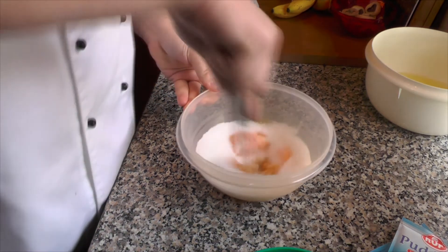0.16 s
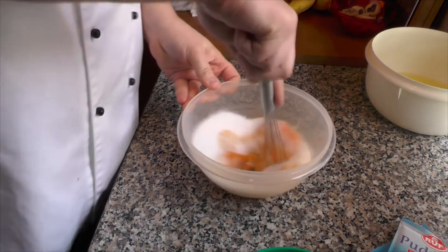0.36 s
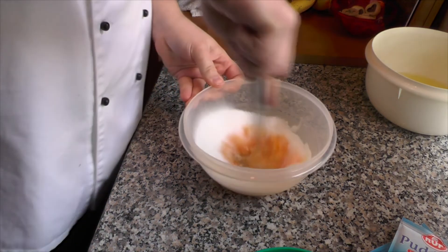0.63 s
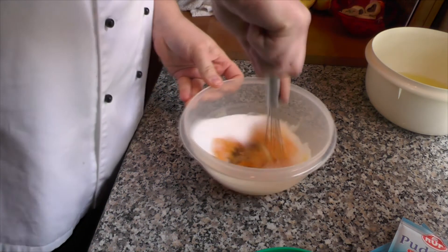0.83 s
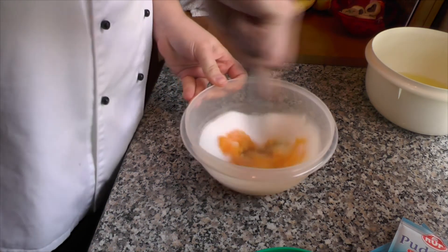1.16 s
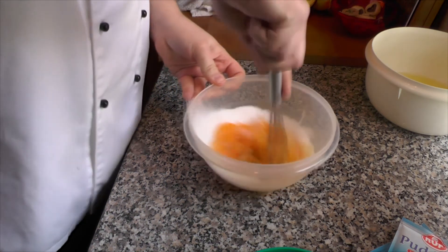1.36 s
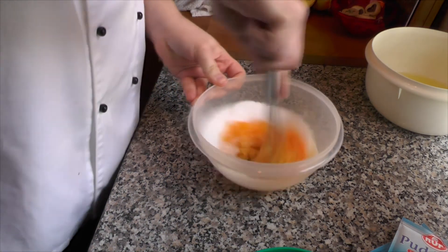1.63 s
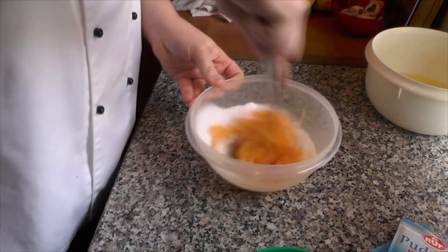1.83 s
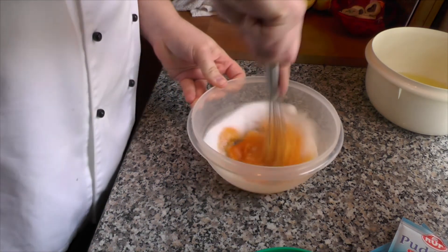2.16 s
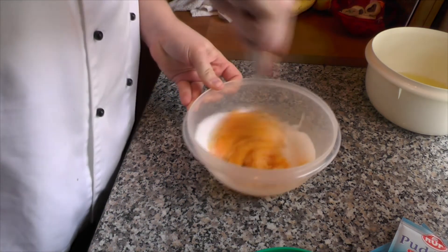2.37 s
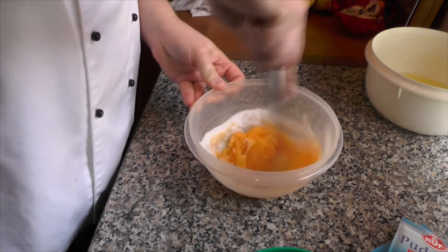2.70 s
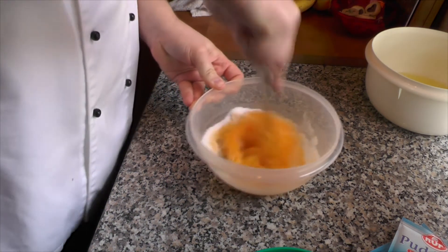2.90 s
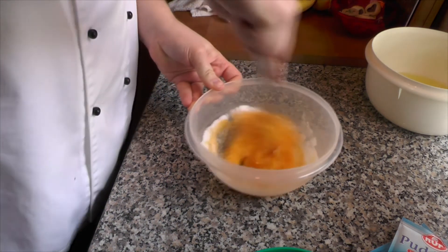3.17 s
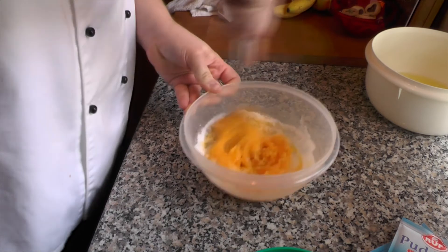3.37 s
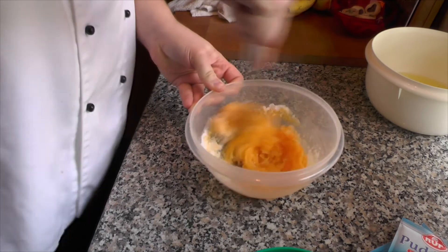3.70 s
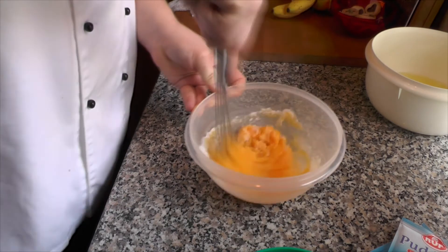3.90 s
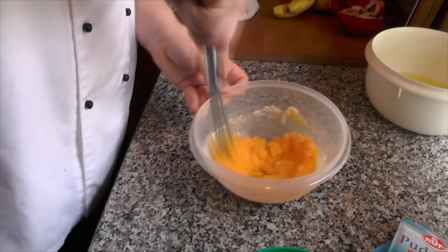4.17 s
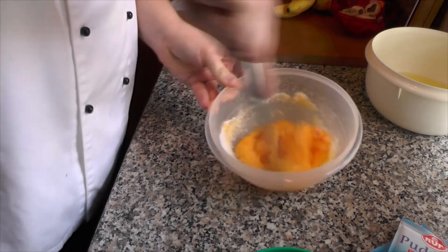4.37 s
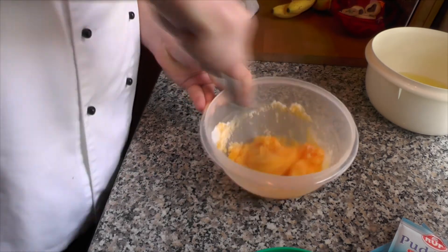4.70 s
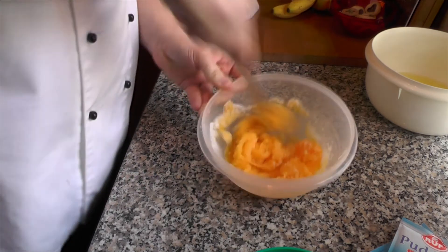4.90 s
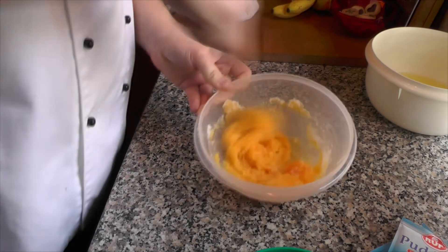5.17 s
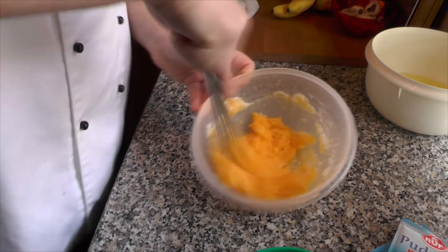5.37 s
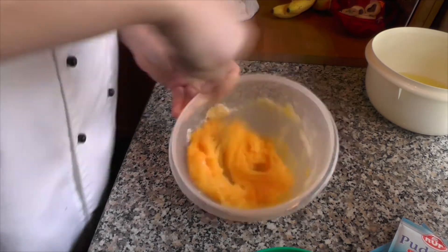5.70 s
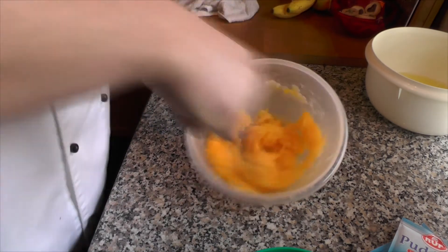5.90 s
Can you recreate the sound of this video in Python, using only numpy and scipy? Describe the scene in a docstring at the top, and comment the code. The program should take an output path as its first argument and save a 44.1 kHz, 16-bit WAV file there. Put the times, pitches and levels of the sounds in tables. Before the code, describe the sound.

A metal whisk beats yolks and sugar in a thin plastic bowl on a stone counter. Quick, uneven strokes, several per second, crunch and hiss over gritty sugar, with hollow plastic knocks and dry wire clicks. Early strokes drum more on the bowl; later ones are brighter and more crackly. Close stereo microphone in a small, fairly dry kitchen, stronger on the right, with faint low room air.

```python
"""Whisk in a thin plastic bowl

A wire whisk beats egg yolks and sugar in a thin plastic bowl on a stone kitchen counter.
Dragged sugar crunches and hisses as random grains, which also excite the resonant modes of the bowl.
Knocks strike those modes at once; cracks are dying noise bursts, wire flicks and bowl bumps short damped sines.
One of two microphone ports is half shaded: it is filtered, shifted in phase and partly decorrelated."""
import sys
import numpy as np
from scipy import signal
from scipy.fft import rfft, irfft, next_fast_len
from scipy.io import wavfile

SR = 44100
rng = np.random.default_rng(int(sys.argv[2]) if len(sys.argv) > 2 else 0)


def unload_wav(signal):
    """Save mono or channel-first audio to the path in sys.argv[1] as 16-bit WAV at rate SR, clipped to [-1, 1]."""
    wavfile.write(
        sys.argv[1],
        SR,
        np.round(np.clip(np.atleast_2d(signal).T, -1, 1) * 32767).astype(np.int16),
    )


def ratio_of_db(decibels):
    """Turn decibels (scalar or array-like) into linear amplitude factors; 0 dB maps to 1."""
    return 10 ** (np.asarray(decibels, float) / 20)


N = 266364   # length in samples
SIZE = next_fast_len(N + SR)   # transform length in samples
HZ = np.maximum(np.arange(SIZE // 2 + 1) * SR / SIZE, 1)

# Source levels are relative: later gains and filters apply to them.
# room air, spectral density: pitch_hz, level_db (per Hz)
AIR_SPECTRUM = [(13, -40), (22, 0), (45, -4), (71, -4.5), (146, 2.5), (200, 1.5), (260, -5.5), (400, -27)]
# resonant modes of the bowl: pitch_hz, level_db, t60_s
BOWL_MODES = [(306, -33, 0.013), (385, -58, 0.18), (482.5, -8.5, 0.29), (567, -16, 0.18), (597, -1.5, 0.21),
              (676, -6.5, 0.24), (718, 7, 0.17), (780, 6, 0.17), (831, 5, 0.2), (897, 4.5, 0.11),
              (975, 11.5, 0.033), (1134, 3.5, 0.066), (1100, -3, 0.08), (1210, 2, 0.051),
              (1261, 12.5, 0.039), (1339, 2, 0.11), (1363, 11, 0.025), (1503, 12, 0.037), (1567, -14, 0.14),
              (1540, -48, 0.098), (1790, -16, 0.12), (1928, -12, 0.18), (2275, -23, 0.2),
              (2670, -21, 0.061)]
# wires dragging through the paste on the bottom:
# full_force_s, hold_s, low_modes_db, high_against_low_modes_db
BOTTOM_DRAGS = [(0.0, .04, -39.5, 5.5), (0.051, 0.031, -28.5, 4.5), (0.1, 0.22, -28, -9),
                (.293, 0.085, -26.5, 3.5), (0.413, 0.097, -34, 9.5), (0.53, .1, -33, 13.5),
                (0.65, 0.066, -27, 0), (0.779, 0.13, -26, 8.5), (0.939, 0.056, -30.5, 1.5),
                (1.084, .04, -25, -10), (1.13, 0.079, -30, 8.5), (1.298, 0.047, -20, -7),
                (1.391, 0.095, -31.5, 0.5), (1.57, 0.059, -19, -3.5), (1.699, 0.068, -30, 1.5),
                (1.84, 0.078, -24.5, -1.5), (1.944, 0.015, -38, 13.5), (2.014, 0.025, -44.5, 14),
                (2.147, 0.021, -32, 3), (2.222, 0.16, -41.5, 12), (2.434, 0.028, -19, -7),
                (2.56, 0.14, -41.5, 7), (2.709, 0.025, -30, 5), (2.899, 0.09, -24.5, -3),
                (3.016, 0.29, -34, 5.5), (3.283, 0.093, -34, 6), (3.413, 0.046, -26.5, -16),
                (3.504, 0.035, -23, -13), (3.62, 0.18, -34, 2.5), (3.817, 0.15, -28.5, -2),
                (4.12, 0.083, -28.5, 1.5), (4.336, .04, -41.5, 1), (4.383, 0.077, -31.5, -12),
                (4.706, 0.047, -38.5, 7), (4.82, 0.02, -35.5, -2), (5.047, 0.031, -41.5, 16.5),
                (5.15, .09, -38, -10), (5.36, 0.016, -37, 6), (5.395, 0.043, -40, -6),
                (5.473, 0.025, -23, -11), (5.65, 0.042, -48.5, 18.5), (5.734, 0.061, -29, -13),
                (5.828, 0.054, -40, 8), (5.967, 0.084, -46, -8.5)]
# wires scraping sugar up the wall: full_force_s, rise_s, hold_s, crunch_db, hiss_against_crunch_db
WALL_SCRAPES = [(0.0, .02, 0.027, -39, -10), (0.067, 0.033, .02, -38, -7), (.16, 0.029, .01, -35, 0.5),
                (0.224, 0.024, 0.015, -30.5, -2.5), (0.307, .01, 0.058, -33, -6),
                (0.411, .005, .012, -26.5, -4), (0.443, .01, 0.059, -38, -1),
                (0.528, .008, 0.087, -32.5, -3.5), (0.658, 0.016, 0.011, -33, 0),
                (0.728, 0.026, 0.014, -36, -2), (0.781, 0.009, 0.076, -32.5, -4),
                (0.896, 0.023, 0.1, -29, -2.5), (1.088, .015, 0.027, -31.5, -6),
                (1.157, 0.026, 0.036, -29.5, -4.5), (1.235, .03, .02, -36.5, -1.5),
                (1.297, 0.016, 0.0087, -26, -8), (1.387, 0.04, 0.049, -26, -8),
                (1.494, .04, 0.028, -30, -6.5), (1.572, .006, 0.017, -21, -11.5),
                (1.674, .005, 0.049, -27, -4.5), (1.837, 0.017, .03, -32, -17),
                (1.916, 0.036, .03, -36, -1), (1.947, .006, 0.018, -28.5, -4.5),
                (2.006, .03, 0.035, -25, -10), (2.218, 0.052, 0.024, -27, -9),
                (2.287, 0.061, 0.018, -23.5, -8), (2.485, 0.019, 0.013, -21, -9),
                (2.533, .03, 0.015, -30, -2.5), (2.558, .01, 0.11, -25.5, -6),
                (2.713, 0.0076, 0.011, -25.5, -5.5), (2.78, 0.035, 0.17, -33.5, -6),
                (3.016, 0.048, 0.12, -26.5, -3.5), (3.27, 0.053, .02, -27, -6),
                (3.29, .008, 0.073, -23.5, -3), (3.385, 0.034, 0.15, -23, -2.5),
                (3.613, 0.042, 0.1, -27, -1), (3.892, 0.066, 0.061, -20.5, -3.5),
                (4.14, 0.07, 0.093, -25, -1), (4.332, 0.0067, 0.013, -24, -9),
                (4.392, 0.026, 0.02, -26, -2.5), (4.491, 0.041, 0.04, -31.5, 6),
                (4.705, 0.02, 0.022, -34, -2), (4.75, .04, 0.023, -28.5, -1.5),
                (4.814, 0.038, 0.038, -26, 2.5), (5.049, 0.022, 0.12, -26.5, -1.5),
                (5.209, 0.016, 0.021, -23.5, -4), (5.349, 0.0098, 0.023, -27.5, -4),
                (5.428, 0.026, .05, -29, -7), (5.48, .02, .01, -25, -5.5), (5.488, .005, 0.011, -25, -14),
                (5.663, 0.068, 0.045, -31, -5), (5.728, 0.033, 0.032, -27.5, -2),
                (5.807, 0.018, 0.025, -28, -4), (5.963, 0.086, 0.027, -31.5, -6),
                (6.027, 0.02, .03, -19, -5)]
# coarse crunch of the sugar, spectral density: pitch_hz, level_db (per Hz)
CRUNCH_SPECTRUM = [(1000, -7), (1700, 0), (2170, 1), (2500, 1.5), (3520, 1.5), (4490, 0), (5520, -9),
                   (7000, -7), (9100, -36), (15400, -120)]
# fine hiss of the sugar, spectral density: pitch_hz, level_db (per Hz)
HISS_SPECTRUM = [(3240, -10), (5500, 2.5), (10100, -3.5), (11300, -4.5), (12600, -3.5), (15100, -6.5),
                 (15900, -6), (16200, -49)]
# crystals cracking under a wire: start_s, peak_db, pitch_hz, treble_against_pitch_band_db
CRYSTAL_CRACKS = [(0.0548, -26, 1870, -14), (0.1027, -22, 2480, -21), (0.163, -16, 2390, -17),
                  (0.2364, -18, 2670, -13), (0.2917, -22, 1740, -14), (0.4188, -8.5, 1990, -6),
                  (0.4737, -18, 1820, -12), (0.4993, -15, 3660, -7), (0.53, -16, 3630, -14),
                  (0.5636, -16, 3890, -16), (0.6005, -19, 3390, -12), (0.6514, -13, 3380, -15),
                  (0.7783, -24, 2030, -8), (0.8754, -15.5, 3390, -17), (0.9046, -15, 1990, -11),
                  (1.0829, -21, 3040, -17), (1.1348, -11.5, 3670, -21), (1.1583, -12.5, 3130, -18),
                  (1.257, -13.5, 3580, -20), (1.294, -17.5, 3720, -9), (1.3112, -16, 1980, -13),
                  (1.38, -17.5, 1970, -20), (1.4012, -14, 3960, -17), (1.4955, -19.5, 3100, -18),
                  (1.572, -15.5, 1740, 1.5), (1.6327, -18, 1920, -22), (1.6805, -12, 2560, -20),
                  (1.7459, -25, 2030, -16), (1.7757, -16.5, 3250, -9), (1.8427, -15.5, 1850, -14),
                  (1.954, -14, 2780, -11), (2.0088, -14.5, 3130, -18), (2.16, -36, 1750, -20),
                  (2.2807, -10.5, 2500, -21), (2.4871, -12.5, 2500, -22), (2.5631, -12.5, 3000, -17),
                  (2.7132, -16.5, 1920, -18), (2.9178, -17, 2550, -21), (3.0185, -14.5, 2530, -8),
                  (3.058, -26, 3800, -12), (3.2868, -9, 2540, -12), (3.373, -21, 4500, -7),
                  (3.3897, -11.5, 2720, 3), (3.4165, -8, 3840, -9), (3.4512, -8, 2350, 1.5),
                  (3.5024, -6, 3250, -17), (3.6122, -12, 3390, -13), (3.6555, -9.5, 4200, -5),
                  (3.885, -25, 2380, -13), (3.9452, -23, 2900, -12), (4.1124, -20, 1930, -9),
                  (4.1614, -23, 3320, -12), (4.2462, -27, 4320, -11), (4.3295, -6, 1950, -6),
                  (4.3824, -12, 3720, -14), (4.4752, -15, 4300, -8), (4.546, -16, 3140, -7),
                  (4.7485, -20, 3400, -14), (4.8065, -17, 4420, 5), (4.8209, -10, 4100, -5),
                  (4.8454, -15, 2980, -13), (5.0478, -12, 2250, -13), (5.1186, -14.5, 2510, -11),
                  (5.1532, -20, 2970, 4), (5.1826, -12, 3950, -16), (5.2081, -13, 2000, -7),
                  (5.3602, -10.5, 3160, -5), (5.4254, -19, 3800, -20), (5.4934, -11.5, 2200, 2),
                  (5.6575, -15.5, 2740, -12), (5.7004, -17, 4350, -15), (5.7379, -14, 2180, -10),
                  (5.7708, -9.5, 2300, -0.5), (5.798, -13, 4680, -11), (5.9524, -20, 2900, -13),
                  (5.9713, -15, 2600, -16), (6.0122, -22, 2230, -11)]
# wires knocking on the wall: start_s, peak_db, tilt_db_per_octave (high modes against low)
WALL_KNOCKS = [(0.055, -18, -5), (0.235, -16, 7), (0.292, -13.5, 12), (0.423, -23, 9), (0.474, -18, -8),
               (0.53, -12, 3), (0.583, -10.5, 18), (0.779, -20, 14), (0.803, -14, 3), (1.09, -10.5, -1),
               (1.156, -11, 13), (1.31, -2.5, -5.5), (1.578, -13, -22), (1.682, -10, -11), (1.746, -21, 3),
               (1.844, -18, -3), (1.954, -14.5, 4), (2.032, -12, 35), (2.158, -18, -7), (2.234, -29, 5),
               (2.438, -18, -14), (2.575, -14.5, 18), (2.624, -19, -8), (2.714, -12.5, -3),
               (2.895, -11, -18), (3.02, -20, 7), (3.085, -32, 0), (3.384, -13.5, 15), (3.505, -25, -15),
               (3.596, -14.5, 3), (3.657, -15.5, 11), (3.87, -12, 10), (4.13, -20.5, 0), (4.329, -9, 7),
               (4.704, -21, 9), (5.079, -35, -7), (5.118, -32, 5), (5.211, -33, 4), (5.36, -16, 1),
               (5.477, -17, -5), (5.72, -20, -4), (6.01, -17.5, -23)]
# single wires flicking free: start_s, peak_db, pitch_hz
WIRE_FLICKS = [(0.4155, -17, 3300), (0.5354, -14, 3480), (0.6514, -14, 3400), (0.883, -12, 3380),
               (0.9129, -6.5, 3400), (0.9764, -4.5, 3270), (1.1354, -9, 3710), (1.257, -19, 3580),
               (1.313, -8, 3630), (1.3803, -8, 3610), (1.4012, -9, 3850), (1.4184, -8, 3670),
               (1.4274, -18, 3420), (1.5718, -14, 3560), (1.6818, -1, 3460), (1.9515, -3, 3260),
               (2.0294, -9, 3280), (2.0314, -13, 3280), (2.042, -15, 3350), (2.2822, -2, 3570),
               (2.4867, 0.5, 3880), (2.5621, -10, 3210), (3.0875, -7, 3430), (3.2904, -1, 4480),
               (3.327, -4, 2980), (3.3737, -1.5, 4430), (3.3892, -2, 3210), (3.4152, 0, 3770),
               (3.6561, -9, 4150), (3.928, 1, 5280), (4.2397, 0, 7540), (4.2474, -5, 6050),
               (4.2534, -12, 5990), (4.3298, 1, 3380), (4.511, -20, 4140), (4.5222, -7.5, 3000),
               (4.5481, -15, 3080), (4.7514, -12, 3420), (4.7714, -7.5, 3440), (4.8065, -9, 4420),
               (4.8217, -8, 4250), (4.86, -4, 4210), (5.1544, 0, 4200), (5.1864, -6, 3960),
               (5.2213, -6, 4140), (5.2324, -4, 3880), (5.3602, -19, 3370), (5.4261, -9, 3820),
               (5.4914, -17, 3090), (5.4984, -10, 4670), (5.7175, -4.5, 3390), (5.7424, -10, 5210),
               (5.7688, 1.5, 4020), (6.0122, -8, 3000)]
# the bowl bumping on the counter: start_s, peak_db, pitch_hz, t60_s (at most 0.2 is used)
COUNTER_BUMPS = [(0.45, -40, 141, 0.071), (0.904, -37, 196, 0.035), (1.312, -35, 220, 0.11),
                 (1.405, -45, 80, 0.071), (1.589, -31, 203, 0.1), (2.897, -22.5, 184, 0.027),
                 (3.597, -20, 273, 0.02), (4.331, -41, 204, 0.26), (4.336, -50, 85, 0.094),
                 (5.152, -41, 90, 0.065), (5.487, -44, 150, 0.067), (5.771, -47, 80, .07)]
# left port against right: pitch_hz, level_db
PORT_SHADE = [(200, 0), (330, -11.5), (500, -10.5), (770, -12.5), (1170, -10), (1790, -9.5), (2740, -11),
              (4190, -12.5), (6410, -12.5), (8000, -6.5), (9810, -2.5), (12000, -7.5), (15000, -5)]
# amplitude share of the sound common to both ports: pitch_hz, share
PORT_LIKENESS = [(60, 0.17), (110, 0.7), (200, 0.81), (380, 0.3), (700, 0.59), (1290, .9), (2380, 0.54),
                 (4400, .75), (8120, 0.7), (15000, 0.9)]
# phase by which the left port leads: pitch_hz, lead_rad
PORT_LEAD = [(0, 1.8), (340, -1.05), (780, 1.15), (1380, 0.57), (1890, -0.5), (2580, -1.5), (3620, 0.84),
             (6550, 1.4), (8010, 0.51), (8530, .6), (9300, -0.23), (16500, -0.12)]

KITCHEN_T60_S, KITCHEN_DB = 0.2, -13
RISE_DB = 15   # a contact climbs by this much during its rise
DRAG_RISE_S = 0.0037
DRAG_FALL_DB_PER_S, SCRAPE_FALL_DB_PER_S = 260, 222
DRAG_SAG_DB_PER_S, SCRAPE_SAG_DB_PER_S = 36, 2   # loss of force while a contact holds
# the whisk stirring between contacts, on the scale of the contact tables
IDLE_CRUNCH_DB, IDLE_HISS_DB, IDLE_WALL_DB = -36.5, -42.5, -44
RATTLE_T60_S, CRACK_T60_S = 0.094, 0.047
FLICK_CYCLES = 7.7   # t60 of a flick, in cycles


def rms_one(x):
    """Normalisation: the mean power becomes 1."""
    return x / np.sqrt(np.mean(x ** 2) + 1e-20)


def at_hz(points):
    """Logarithmic frequency: a table is interpolated along a log axis."""
    hz, value = np.transpose(points)
    return np.interp(np.log(HZ), np.log(np.maximum(hz, 1)), value)


def shaped(x, response):
    """Linear filtering: the spectrum is multiplied by a frequency response."""
    return irfft(rfft(x, SIZE) * response, SIZE)[..., :N]


def drift(rate_hz):
    """Random fluctuation: noise through two equal low-pass poles, rms 1."""
    r = np.exp(-2 * np.pi * rate_hz / SR)
    settled = signal.lfilter([1], [1, -2 * r, r * r], rng.standard_normal(N + SR))[SR:]
    return rms_one(settled)


def ring(clicks, hz, t60):
    """Damped resonance: a unit click starts a decaying sine of height 1."""
    r, w = ratio_of_db(-60 / (t60 * SR)), 2 * np.pi * hz / SR
    return signal.lfilter([0, np.sin(w)], [1, -2 * r * np.cos(w), r * r], clicks + 1e-18)


def single_rings(rows):
    """Impulse response: each row (start_s, peak_db, pitch_hz, t60_s) is one damped sine."""
    out, click = np.zeros(N + SR), np.eye(1, SR // 4)[0]
    for start_s, peak_db, hz, t60 in rows:
        sine = ring(click, hz, np.clip(t60, 0.0003, 0.2))
        out[round(start_s * SR):][:len(click)] += ratio_of_db(peak_db) * sine
    return out[:N]


def grains(per_s, spread_db, clumps):
    """Shot noise: random clicks of uneven size, clumped as wire after wire catches; rms 1."""
    born = rng.random(N) < per_s * clumps / SR
    sizes = ratio_of_db(spread_db * np.minimum(rng.exponential(1, N), 5))
    return rms_one(born * sizes * rng.choice([-1, 1], N))


def contacts(rows, sag_db_per_s, fall_db_per_s, idle_db):
    """Power summation: contacts (s, rise s, hold s, dB) rise, sag while held and fade; level in dB."""
    t = np.arange(0, N + 64, 64) / SR
    power = ratio_of_db(2 * idle_db)
    for full_s, rise_s, hold_s, level_db in rows:
        rising_db = RISE_DB * np.maximum(full_s - t, 0) / max(rise_s, 0.003)
        sag_db = sag_db_per_s * np.clip(t - full_s, 0, hold_s)
        fall_db = fall_db_per_s * np.maximum(t - full_s - hold_s, 0)
        power = power + ratio_of_db(2 * (level_db - rising_db - sag_db - fall_db))
    return np.interp(np.arange(N) / SR, t, 10 * np.log10(power))


def room_air():
    """Stationary noise: two independent shaped noises share one fluctuating level."""
    noise = shaped(rng.standard_normal((2, N)), ratio_of_db(at_hz(AIR_SPECTRUM)))
    return ratio_of_db(-60 + 2.4 * drift(14.0)) * rms_one(noise)


def drag_level(high):
    """Contact force: level in dB of the drags on the low (0) or high (1) modes of the wall."""
    rows = [(full_s, DRAG_RISE_S, hold_s, low_modes_db + high * tilt_db)
            for full_s, hold_s, low_modes_db, tilt_db in BOTTOM_DRAGS]
    return contacts(rows, DRAG_SAG_DB_PER_S, DRAG_FALL_DB_PER_S, IDLE_WALL_DB)


def rubbing(clumps):
    """Modal excitation: rolling crystals drive every bowl mode, more or less as the contact moves."""
    low_db, high_db = drag_level(0), drag_level(1)
    drive = grains(800, spread_db=3.0, clumps=clumps)
    out, mode_power = np.zeros(N), 0
    for hz, mode_db, t60 in BOWL_MODES:
        # low modes give way to high ones over the half octave above 800 Hz
        high_share = np.clip(np.log2(hz / 800) / 0.5, 0, 1)
        wall_db = low_db + (high_db - low_db) * high_share
        wander_db = 3.0 * drift(12)
        out += ring(drive * ratio_of_db(mode_db + wall_db + wander_db), hz, t60)
        # energy of a damped sine, for a drive of rms 1
        mode_power += ratio_of_db(2 * mode_db) * t60 * SR / (12 * np.log(10))
    return ratio_of_db(-3.5) * out / np.sqrt(mode_power)


def scrape_levels():
    """Contact force: levels in dB of the crunch and of the hiss as wires scrape the wall."""
    crunch_rows = [row[:4] for row in WALL_SCRAPES]
    hiss_rows = [(*row[:3], row[3] + row[4]) for row in WALL_SCRAPES]
    crunch_db = contacts(crunch_rows, SCRAPE_SAG_DB_PER_S, SCRAPE_FALL_DB_PER_S, IDLE_CRUNCH_DB)
    hiss_db = contacts(hiss_rows, SCRAPE_SAG_DB_PER_S, SCRAPE_FALL_DB_PER_S, IDLE_HISS_DB)
    return crunch_db, hiss_db


def crunch(crunch_db, clumps):
    """Filtered shot noise: coarse grains, coloured and following the force of the scrapes."""
    coarse = shaped(grains(3000, spread_db=0.0, clumps=clumps), ratio_of_db(at_hz(CRUNCH_SPECTRUM)))
    return ratio_of_db(crunch_db - 1.5) * rms_one(coarse)


def hiss(hiss_db, clumps):
    """Dense shot noise: fine grains come so thickly that they fuse into a hiss."""
    fine = shaped(grains(7000, spread_db=2.0, clumps=clumps), ratio_of_db(at_hz(HISS_SPECTRUM)))
    return ratio_of_db(hiss_db - 1.0) * rms_one(fine)


def pops(crunch_db, clumps):
    """Brief resonance: larger crystals break singly; pitch wanders as the wires travel the wall."""
    breaks = grains(320, spread_db=4.5, clumps=clumps)
    pitch_place = 5.5 + 1.5 * drift(5) + 1.8 * rng.standard_normal(N)
    dealt = np.clip(np.round(pitch_place), 0, 11)   # one of twelve pitches for each break
    rings = np.zeros(N)
    for k, hz in enumerate(np.geomspace(1600, 7000, 12)):
        rings += ring(breaks * (dealt == k), hz, 25.0 / hz)
    return ratio_of_db(crunch_db - 11.0) * rms_one(rings)


def cracks():
    """Fracture burst: dying noise excites a broad ring at its pitch and a spray of treble."""
    out, t = np.zeros(N + SR), np.arange(SR // 10) / SR
    fade = ratio_of_db(-60 * t / CRACK_T60_S)
    bright = signal.butter(2, 4500, "high", fs=SR, output="sos")
    for start_s, peak_db, hz, treble_db in CRYSTAL_CRACKS:
        low, high = rng.standard_normal((2, len(t)))
        body = ring(low * fade, hz, 7.0 / hz)
        spray = signal.sosfilt(bright, high * fade)
        burst = body / np.abs(body).max() + ratio_of_db(treble_db) * spray / np.abs(spray).max()
        out[round(start_s * SR):][:len(t)] += ratio_of_db(peak_db) * burst
    return out[:N]


def knocks():
    """Impact excitation: the first wire strikes each mode by its own strength, others rattle after it."""
    out, t = np.zeros(N + SR), np.arange(SR // 4) / SR
    for start_s, peak_db, tilt_db in WALL_KNOCKS:
        strengths_db = rng.normal(0, 2.5, len(BOWL_MODES))
        later_wires = (rng.random(len(t)) < 350 / SR) * rng.standard_normal(len(t))
        blows = ratio_of_db(-2.5) * later_wires * ratio_of_db(-60 * t / RATTLE_T60_S)
        blows[0] = 1
        body = np.zeros(len(t))
        for (hz, mode_db, t60), own_db in zip(BOWL_MODES, strengths_db):
            body += ratio_of_db(mode_db + own_db + tilt_db * np.log2(hz / 800)) * ring(blows, hz, t60)
        out[round(start_s * SR):][:len(t)] += ratio_of_db(peak_db) * body / np.abs(body).max()
    return out[:N]


def flicks():
    """Heavily damped vibration: a wire flicking free is dead after a few cycles."""
    return single_rings([(*row, FLICK_CYCLES / row[2]) for row in WIRE_FLICKS])


def thumps():
    """Low-frequency cut-off: each bump rings briefly; the counter passes little below its pitch."""
    out = np.zeros(N)
    for row in COUNTER_BUMPS:
        counter = signal.butter(2, 0.7 * row[2], "high", fs=SR, output="sos")
        out += signal.sosfilt(counter, single_rings([row]))
    return out


def tail(t60):
    """Reverberation: the response of many reflections is decaying noise, energy 1."""
    t = np.arange(SR // 2) / SR
    echo = rng.standard_normal(len(t)) * ratio_of_db(-60 * t / t60)
    return rfft(echo / np.sqrt(np.sum(echo ** 2)), SIZE)


def scattered(x, t60, count):
    """Time-varying scattering: reflection paths change as the whisk travels round the bowl."""
    shares = np.array([drift(10.8) for k in range(count)])
    shares /= np.sqrt(np.sum(shares ** 2, axis=0))
    return sum(rfft(x * share, SIZE) * tail(t60) for share in shares)


def ports(x):
    """Shading and coherence: the right port hears freely, the left shaded, partly by scattered paths."""
    alike = np.clip(at_hz(PORT_LIKENESS), 0, 1)
    right = rfft(x, SIZE) + ratio_of_db(KITCHEN_DB) * scattered(x, KITCHEN_T60_S, count=2)
    common = alike * np.exp(1j * at_hz(PORT_LEAD)) * right
    separate = np.sqrt(1 - alike ** 2) * scattered(x, 0.02, count=3)
    left = ratio_of_db(at_hz(PORT_SHADE)) * (common + separate)
    return ratio_of_db(4.0) * irfft([left, right], SIZE)[:, :N]


def scene():
    """Superposition: strokes, knocks and cracks through the ports add to bumps and room air."""
    clumps = ratio_of_db(2.0 * drift(40))
    crunch_db, hiss_db = scrape_levels()
    sugar = crunch(crunch_db, clumps) + hiss(hiss_db, clumps) + pops(crunch_db, clumps)
    # crystals and wires are too small for low tones
    tiny = signal.butter(2, 800, "high", fs=SR, output="sos")
    small_sources = signal.sosfilt(tiny, sugar + cracks() + flicks())
    # a small thin bowl radiates no bass
    radiated = signal.butter(6, 320, "high", fs=SR, output="sos")
    bowl = signal.sosfilt(radiated, rubbing(clumps) + knocks() + small_sources)
    bump_gains = ratio_of_db(np.array([[-2.5], [1.5]]))   # left, right
    return ports(bowl) + bump_gains * thumps() + room_air()


def top_cut(x):
    """Nothing passes above the cut-off."""
    return signal.sosfilt(signal.butter(12, 16990, fs=SR, output="sos"), x)


def record(dry):
    """Saturation and band limiting: peaks are rounded and the top is cut at 16.3 kHz."""
    rounded = dry / (1 + np.abs(dry / 0.9) ** 4) ** 0.25
    top = signal.cheby2(12, 60, 16300, fs=SR, output="sos")
    mix = signal.sosfilt(top, rounded)
    return top_cut(mix)


dry = scene()
out = record(dry)
unload_wav(out)
```